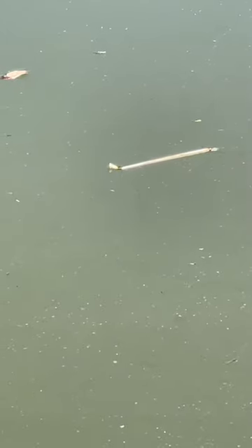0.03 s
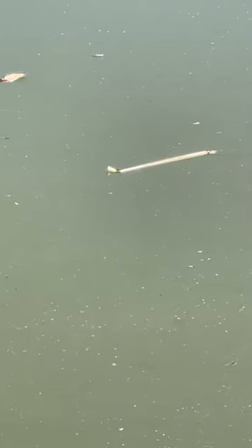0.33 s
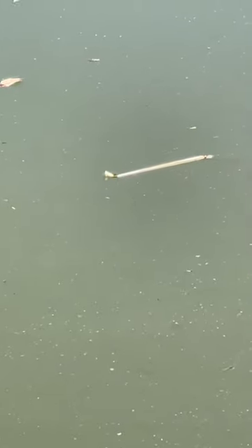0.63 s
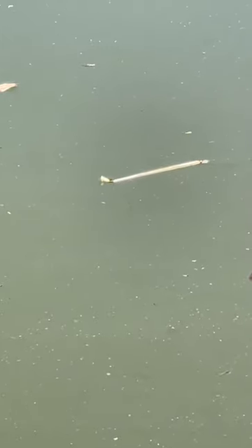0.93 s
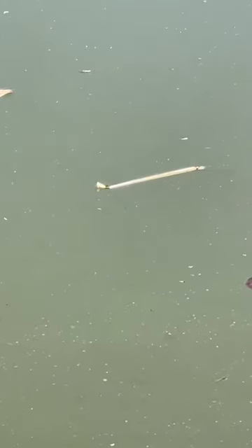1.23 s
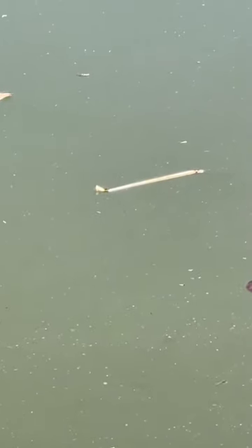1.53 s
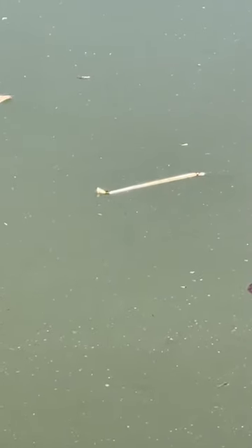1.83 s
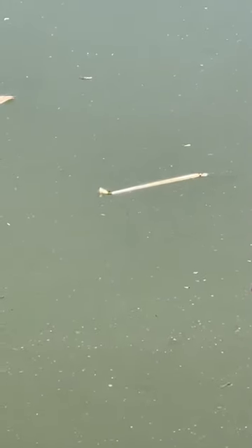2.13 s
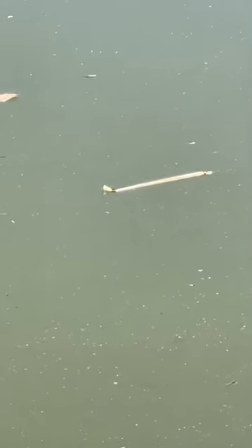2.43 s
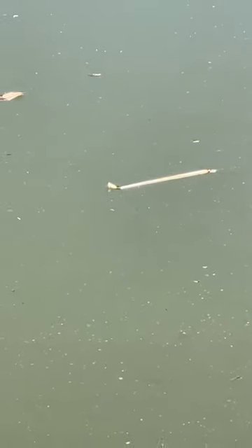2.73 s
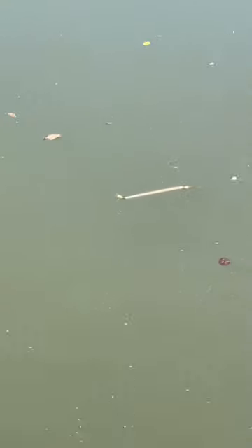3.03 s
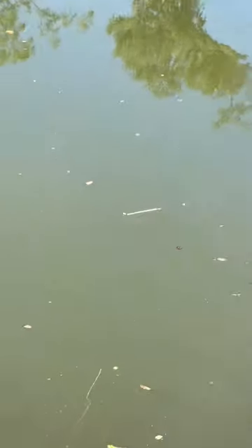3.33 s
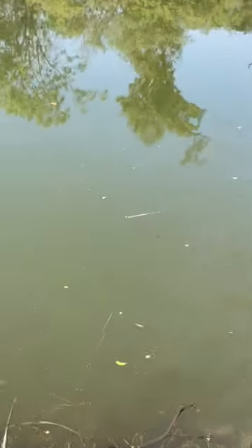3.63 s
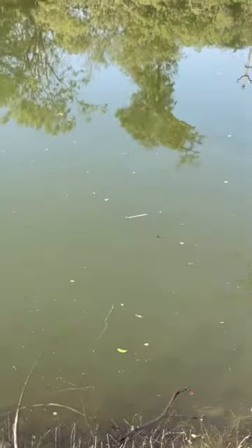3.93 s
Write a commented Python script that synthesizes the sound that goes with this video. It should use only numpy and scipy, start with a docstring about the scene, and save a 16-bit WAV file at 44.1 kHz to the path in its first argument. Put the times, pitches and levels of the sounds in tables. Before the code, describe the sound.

A bird chirps seven times in quick succession beside a quiet pond while insects buzz faintly. Thin high whistles, a brief harsh scold, a grass rustle and a small plop follow, over a distant motor hum.

```python
"""A bird repeats a stuttering chirp seven times by a quiet pond, its warble ringing the beak's resonance.
A second bird drops thin high whistles; one harsh scold of noise bursts follows the chirps.
An insect's wing strokes buzz in short phrases. Twigs tick; near the end dry grass rustles and the
water plops. Underneath, a far motor hums over a low rumble of air."""
import sys
import numpy as np
from scipy import signal
from scipy.fft import rfft, irfft
from scipy.io import wavfile
from scipy.ndimage import uniform_filter1d

SR = 44100
rng = np.random.default_rng(int(sys.argv[2]) if len(sys.argv) > 2 else 0)


def dump_mix(stems):
    """Bounce the given channels to the path in sys.argv[1] as a 16-bit WAV at rate SR."""
    frames = np.atleast_2d(stems).T  # one column per channel
    limited = np.clip(frames, -1, 1)  # hard clip at full scale
    pcm = np.round(limited * 32767).astype(np.int16)
    wavfile.write(sys.argv[1], SR, pcm)


N = 176400
T = np.arange(N) / SR
FREQS = np.maximum(np.arange(N // 2 + 1) * SR / N, 1)


def amp(db):
    """Decibels to gain."""
    return 10 ** (np.asarray(db) / 20)


def unit(x):
    """Scale to rms 1."""
    return x / np.sqrt(np.mean(x ** 2))


def curve(points):
    """Straight lines through (time [s], value) points."""
    return np.interp(T, *np.array(points).T)


def shaped(points):
    """Noise from (frequency [Hz], density [dB/Hz]) points."""
    hz, db = np.array(points).T
    gain = amp(np.interp(np.log(FREQS), np.log(hz), db))
    return irfft(rfft(rng.standard_normal(N)) * gain, N) * np.sqrt(SR / 2)


def bell(hz, width_hz):
    """Gaussian weight over frequency."""
    return np.exp(-((FREQS - hz) / width_hz) ** 2)


def band(hz, width_hz):
    """Noise in one bell-shaped band, rms 1."""
    return unit(irfft(rfft(rng.standard_normal(N)) * bell(hz, width_hz), N))


def walk(rate_hz):
    """Smooth random drift, rms 1."""
    hold = int(SR / rate_hz)
    steps = np.repeat(rng.standard_normal(N // hold + 2), hold)
    return unit(uniform_filter1d(uniform_filter1d(steps, hold), hold)[:N])


def stereo(mid, side):
    """Left and right from mid and side."""
    return np.array([mid + side, mid - side])


def tone(hz):
    """Sine following a pitch curve."""
    return np.sin(2 * np.pi * np.cumsum(hz) / SR)


def clock(length_s):
    """Sample times of one note."""
    return np.arange(max(int(length_s * SR), 2)) / SR


def gate(t, attack_s, release_s):
    """Rise, hold and fall over one note."""
    ramp = np.minimum(t / attack_s, (t[-1] - t) / release_s)
    return np.sin(np.pi / 2 * np.clip(ramp, 0, 1)) ** 2


def burst(start_s, attack_s, decay_s):
    """Linear rise, exponential fall."""
    age = np.maximum(T - start_s, 0)
    return np.minimum(age / attack_s, 1) * np.exp(-np.maximum(age - attack_s, 0) / decay_s)


def add(out, start_s, x):
    """Mix a note in at its time."""
    i = max(int(start_s * SR), 0)
    out[i:i + len(x)] += x[:max(N - i, 0)]


def trees(x, t60_s, delay_s, side_db):
    """Scattered echoes from the trees round the pond."""
    t = clock(t60_s)
    tails = rng.standard_normal((2, len(t))) * amp(-60 * t / t60_s) * (t > min(delay_s, t60_s / 2))
    mid, side = (signal.fftconvolve(x, tail / np.linalg.norm(tail))[:N] for tail in tails)
    return stereo(mid, side * amp(side_db))


def warble(pitch_ratio, stretch, waver_hz, level_db):
    """Pitch drops, leaps and settles five times, flashing as it crosses the beak's resonance."""
    # pitch swings (delay [s], effort [dB])
    swings = [(0, 2), (.0225, 0), (.0415, 3), (.053, 2), (.065, 1)]
    rest_hz, rise_hz_per_s, low_hz, low_s = 3270, 2400, 2230, .0019
    leap_hz, leap_delay_s, leap_s, settle_s = 860, .0035, .0014, .0019
    beak_hz, beak_width_hz, beak_follow_hz_per_s = 3480, 190, 330000
    sag_db_per_s = 200
    t = clock(.075 * stretch)
    delays_s, effort_db = np.array(swings).T
    age = t - delays_s[:, None] * stretch
    low = np.exp(-(age / low_s) ** 4).max(axis=0)
    since_leap = age - leap_delay_s
    rising = np.exp(-(since_leap / leap_s) ** 2)
    settling = np.exp(-np.abs(since_leap) / settle_s)
    leap = np.where(since_leap < 0, rising, settling).max(axis=0)
    leap *= np.interp(t, [t[-1] / 2, t[-1]], [1, .28])  # late leaps are smaller
    upper_hz = rest_hz + rise_hz_per_s * t + leap_hz * leap + waver_hz[:len(t)]
    hz = upper_hz * (1 - low) + low_hz * low
    beak = 1 / np.hypot(1, (uniform_filter1d(hz, 70) - beak_hz) / beak_width_hz)
    sweep_hz_per_s = np.abs(np.gradient(hz)) * SR
    beak /= np.hypot(1, sweep_hz_per_s / beak_follow_hz_per_s)  # fast sweeps are weaker
    latest = np.maximum((age >= 0).sum(axis=0) - 1, 0)
    sag_db = sag_db_per_s * (t - delays_s[latest] * stretch)
    effort = amp(level_db[:len(t)] + effort_db[latest] - sag_db)
    return tone(hz * pitch_ratio) * uniform_filter1d(beak, 70) * effort * gate(t, .006, .004)


def slur(pitch_ratio, stretch, db):
    """Falling, swelling whistle that ends a chirp."""
    from_hz, to_hz = 3280, 3020
    t = clock(.043 * stretch)
    progress = t / t[-1]
    hz = to_hz + (from_hz - to_hz) * (1 - progress) ** 1.7
    swell = amp(db - 4.44 * (1.5 - progress))
    return tone(hz * pitch_ratio) * gate(t, .0045, .0073) * swell


def chirping_bird():
    """Seven chirps, each a warble and a slur, echoed by trees and the far bank."""
    # chirps (time [s], level [dB], pitch [ratio], time stretch [ratio])
    chirps = [(.066, -55, 0.99, 1.02), (.291, -52.5, 0.99, 1.02), (.518, -54, 0.98, 1.01),
              (.739, -54, 0.99, 1.01), (.965, -54.5, 1, 1.07), (1.198, -54.5, 0.97, 1.03),
              (1.460, -55, 0.97, 1.005)]
    out = np.zeros(N)
    waver_hz, flutter_db = 80 * walk(240), 2 * walk(150)
    for start_s, db, pitch_ratio, stretch in chirps:
        i = int(start_s * SR)
        add(out, start_s, warble(pitch_ratio, stretch, waver_hz[i:], db + flutter_db[i:]))
        add(out, start_s + .073 * stretch, slur(pitch_ratio, stretch, db - 4))
    near = amp(-7) * trees(out, t60_s=.12, delay_s=.0051, side_db=-1)
    far = amp(-16.5) * trees(out, t60_s=.8, delay_s=.022, side_db=-11)
    late_echo = np.zeros(N)
    add(late_echo, .25, amp(-26.5) * out)
    return out + near + far + late_echo


def thin_bird():
    """Pure high whistles that crest and fall, scattered by leaves and echoed a little later by the trees."""
    # calls (time [s], length [s], top pitch [Hz], fall [Hz], level [dB])
    calls = [(.121, 0.037, 5695, 490, -57), (1.067, 0.037, 5540, 387, -64.5),
             (1.946, 0.038, 5970, 700, -57), (2.716, 0.048, 5843, 690, -57.5),
             (3.438, 0.0456, 6045, 230.4, -58)]
    crest_share = .31
    out = np.zeros(N)
    for start_s, length_s, top_hz, fall_hz, db in calls:
        t = clock(length_s)
        from_crest = np.abs((t / t[-1] - crest_share) / (1 - crest_share))
        hz = top_hz - fall_hz * from_crest ** 1.3
        add(out, start_s, tone(hz) * gate(t, .0072, .015) * amp(db))
    leaves = amp(-6.5) * trees(out, t60_s=.17, delay_s=.0079, side_db=-2)
    late_echo = amp(-8.5) * trees(out, t60_s=.14, delay_s=.031, side_db=-6)
    return out + leaves + late_echo


def scolding_bird():
    """A quick run of hoarse bursts through the throat's resonances."""
    # bursts (time [s], level [dB])
    bursts = [(2.161, -63.5), (2.191, -62.5), (2.214, -62), (2.227, -66.5), (2.239, -62), (2.253, -77),
              (2.263, -62), (2.278, -65), (2.292, -63.5), (2.307, -64.5), (2.32, -64), (2.336, -72.5),
              (2.347, -66.5)]
    # throat spectrum (frequency [Hz], relative level [dB])
    throat = [(1200, -18), (2050, -17), (2450, 2), (2950, -13.5), (3700, -8.5), (4550, 0.5), (5300, 4),
              (6300, -2.5), (7300, -9), (8300, -40), (12000, -41.5)]
    envelope = sum(amp(db) * burst(start_s, .003, .0084) for start_s, db in bursts)
    out = unit(shaped(throat)) * envelope
    return out + amp(-2.5) * trees(out, t60_s=.1, delay_s=.0032, side_db=-2.5)


def buzzing_insect():
    """Each wing stroke is a short falling ping with a faint octave."""
    # phrases (time [s], length [s], level [dB], pitch [Hz])
    phrases = [(0, 0.085, -68, 6620), (.192, .125, -69, 6670), (.325, 0.14, -73.5, 6530),
               (.438, 0.12, -69, 6680), (.562, 0.056, -74.5, 6480), (.654, 0.17, -70, 6630),
               (.897, 0.2, -68.5, 6630), (1.138, 0.17, -70, 6640), (1.41, 0.14, -81.5, 6673),
               (1.565, 0.14, -76.5, 6680), (1.72, 0.16, -79, 6750), (1.91, .11, -78.5, 6750),
               (2.08, 0.2, -77, 6740), (2.45, 0.12, -78.5, 6670), (2.64, .125, -78.5, 6746),
               (2.83, 0.11, -78, 6730), (3.02, .145, -78, 6680), (3.22, 0.16, -78.5, 6640)]
    stroke_hz, stroke_share, fall_hz_per_stroke = 80.43, .19, 974
    out, drift = np.zeros(N), walk(120)
    for start_s, length_s, db, pitch_hz in phrases:
        t = clock(length_s)
        waver = drift[int(start_s * SR):][:len(t)]
        cycle = t * stroke_hz + .06 * waver
        strength = amp(2.2 * rng.standard_normal(64))[cycle.astype(int) % 64]
        phase = cycle % 1 - .35
        strokes = np.exp(-(phase / stroke_share) ** 2) * strength
        hz = pitch_hz - fall_hz_per_stroke * phase + 60 * waver
        ping = tone(hz) + amp(-22) * tone(2 * hz)
        add(out, start_s, ping * strokes * gate(t, .002, .004) * amp(db))
    return out + amp(-5) * trees(out, t60_s=.12, delay_s=.002, side_db=.5)


def far_insect():
    """A farther insect's narrow, flickering sizzle."""
    # sizzle (time [s], level [dB])
    sizzle = [(0, -91.5), (1.3, -91), (1.8, -92), (2.45, -89), (2.6, -104), (4, -107)]
    centre_hz, width_hz = 7290, 380
    hiss = stereo(band(centre_hz, width_hz), band(centre_hz, width_hz))
    return hiss * amp(curve(sizzle) + 3.1 * walk(40))


def plop():
    """One small plop whose pitch drops within a few cycles; it reaches the left microphone first."""
    from_hz, to_hz, fall_s, lag_s = 2400, 504, .0023, .0003
    out, t = np.zeros(N), clock(.0099)
    hz = to_hz + (from_hz - to_hz) * np.exp(-t / fall_s)
    add(out, 3.668, tone(hz) * gate(t, .003, .0025) * amp(-49))
    direct = np.array([out, np.roll(out, int(lag_s * SR))])
    return direct + amp(-12) * trees(out, t60_s=.18, delay_s=.00033, side_db=-2)


def grass():
    """Dry grass rustles: a dull scuff and a grainy hiss."""
    # rustles (time [s], length [s], scuff level [dB], hiss level [dB])
    rustles = [(2.994, 0.17, -72, -91.5), (3.427, 0.13, -67.5, -69), (3.524, 0.14, -63.5, -84.5)]
    # scuff spectrum (frequency [Hz], relative level [dB])
    scuff_colour = [(250, 9), (700, 5), (1250, -3.5), (1900, 1.5), (3000, -14.5), (4500, -31), (12000, -44)]
    # hiss spectrum (frequency [Hz], relative level [dB])
    hiss_colour = [(1000, -12), (2800, 1), (4000, -2.5), (6500, 2), (8000, -10.5), (11000, -13.5),
                   (14000, -32)]
    scuff_gain, hiss_gain = np.zeros(N), np.zeros(N)
    for start_s, length_s, scuff_db, hiss_db in rustles:
        t = clock(length_s)
        add(scuff_gain, start_s, gate(t, .03, .071) * amp(scuff_db))
        add(hiss_gain, start_s, gate(t, .025, .0652) * amp(hiss_db))
    scuff = stereo(unit(shaped(scuff_colour)), unit(shaped(scuff_colour))) * amp(1.074 * walk(210))
    hiss = stereo(unit(shaped(hiss_colour)), amp(-8) * unit(shaped(hiss_colour))) * amp(2 * walk(300))
    return scuff * scuff_gain + hiss * hiss_gain


def twigs():
    """Twigs tick in short bursts of broad noise."""
    # ticks (time [s], level [dB], band centre [Hz])
    ticks = [(0.125, -66.5, 4300), (0.446, -71.5, 2570), (0.879, -73, 2257), (3.113, -70.5, 10000),
             (3.928, -81.5, 3470)]
    out = np.zeros((2, N))
    for start_s, db, hz in ticks:
        noise = stereo(band(hz, hz * .54), band(hz, hz * .45))
        out += noise * amp(db) * burst(start_s, .0029, .0049)
    return out


def motor():
    """A far hum that swells and fades on the air; each overtone fades on its own."""
    # fundamental (time [s], pitch [Hz], level [dB])
    fundamental = [(0.0, 152.8, -46.5), (0.51, 148.4, -63.5), (0.75, 151.4, -52.5), (1.08, 151.0, -71.5),
                   (1.19, 150.9, -51), (2.91, 151.5, -44.5), (3.16, 148.4, -59.5), (3.25, 149.6, -47.5),
                   (3.93, 153.2, -57.5), (4.0, 162.6, -64)]
    # second harmonic (time [s], level [dB])
    second = [(0.0, -66.5), (0.48, -83), (0.99, -70), (1.29, -79.5), (1.95, -66), (2.51, -78.5),
              (2.63, -65), (3.16, -83), (3.25, -67), (4.0, -75.5)]
    # third harmonic (time [s], level [dB])
    third = [(0.0, -86), (1.36, -86), (1.45, -73.5), (1.59, -84), (2.84, -84.5), (3.03, -69.5), (3.22, -85),
             (3.89, -81), (4.0, -100)]
    times_s, hz, db = np.array(fundamental).T
    pitch_hz = np.interp(T, times_s, hz)
    out = tone(pitch_hz) * amp(np.interp(T, times_s, db)) * amp([[-1.2], [.9]])  # left, right
    for harmonic, levels in [(2, second), (3, third)]:
        overtone = tone(harmonic * (pitch_hz + .5 * walk(9))) * amp(curve(levels) + 2 * walk(7))
        left_right_db = [-6 + 2 * walk(11), 3.5 + walk(7.4)]
        out += overtone * amp(left_right_db)
    return np.sqrt(2) * out


def air():
    """Low rumble and faint hiss of open air, gently wavering."""
    # air common to both sides (frequency [Hz], density [dB/Hz])
    mid = [(20, -106), (40, -77.5), (60, -74), (115, -76.5), (200, -88), (300, -95), (420, -105),
           (650, -114), (1000, -117), (2000, -121), (4000, -127), (6500, -125), (8000, -127), (11000, -128),
           (12500, -135), (14000, -146)]
    # air that differs between sides (frequency [Hz], density [dB/Hz])
    side = [(20, -120), (60, -99), (250, -94), (600, -112), (1200, -117), (2500, -130), (4000, -133),
            (5200, -127), (8700, -122), (11000, -129), (12200, -146)]
    return stereo(shaped(mid), shaped(side)) * amp(1.1 * walk(2.1))


def scene():
    """Birds and insects with the hum, the sounds of the bank and the air."""
    birds = chirping_bird() + thin_bird() + scolding_bird()
    insects = buzzing_insect() + far_insect()
    return birds + insects + motor() + grass() + twigs() + plop() + air()


def record(dry):
    """The microphone pair has narrow dips in its response and cuts the top."""
    # mid response dips (frequency [Hz], width [Hz], gain [dB])
    mid_dips = [(4844, 265, -17.5), (9166, 760, -27.5)]
    # side response dips (frequency [Hz], width [Hz], gain [dB])
    side_dips = [(1970, 340, -19.5), (5770, 380, -12.5)]
    top_hz = 13500

    def dipped(x, dips):
        response_db = sum(db * bell(hz, width_hz) for hz, width_hz, db in dips)
        return irfft(rfft(x) * amp(response_db), N)

    left, right = dry
    heard = stereo(dipped((left + right) / 2, mid_dips), dipped((left - right) / 2, side_dips))
    return signal.sosfilt(signal.ellip(8, .2, 70, top_hz, fs=SR, output="sos"), heard)


dry = scene()
out = record(dry)
dump_mix(out)
```